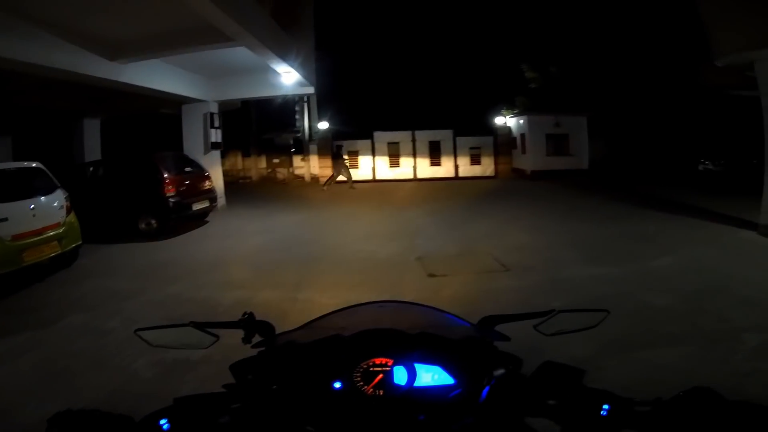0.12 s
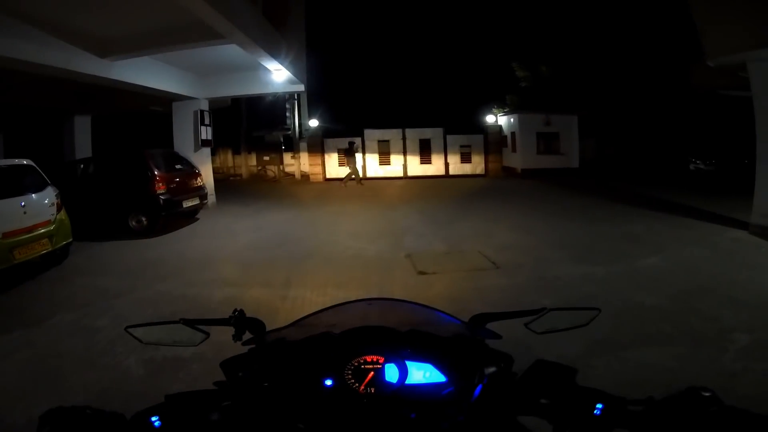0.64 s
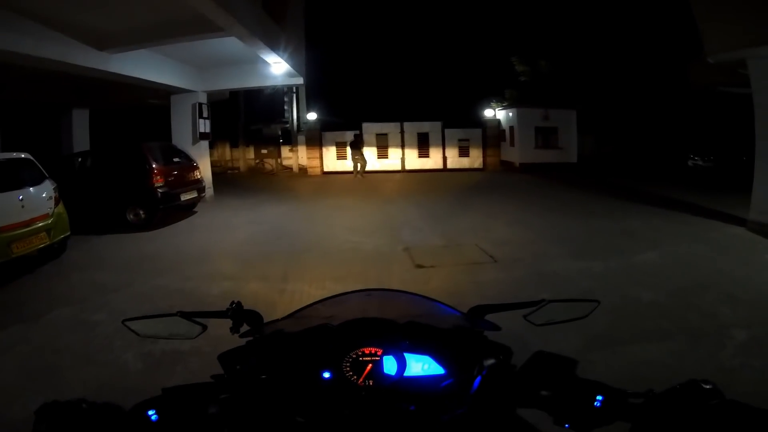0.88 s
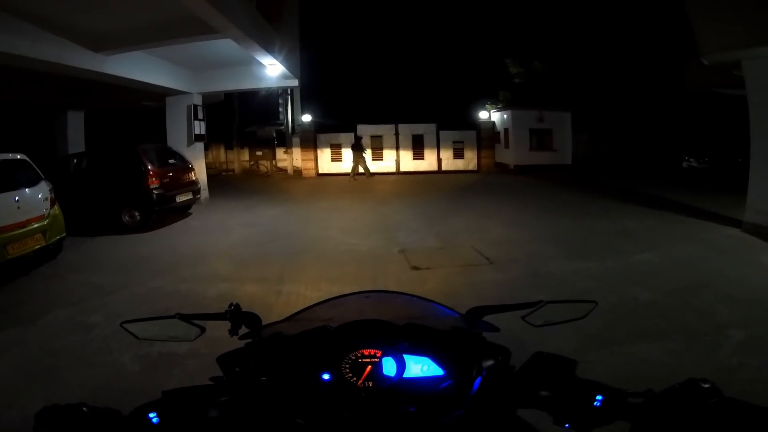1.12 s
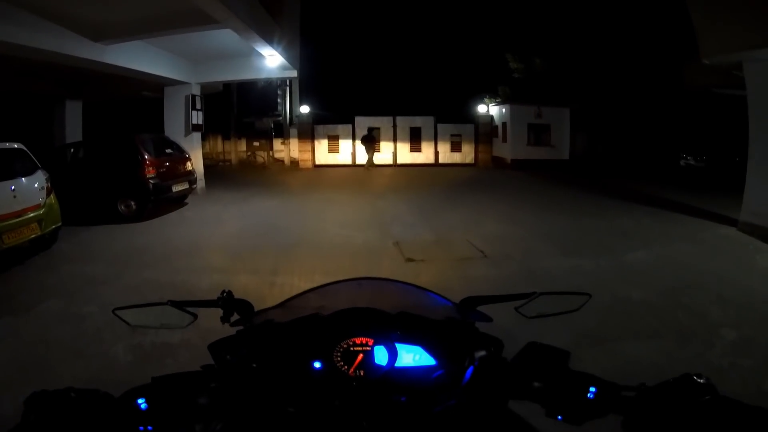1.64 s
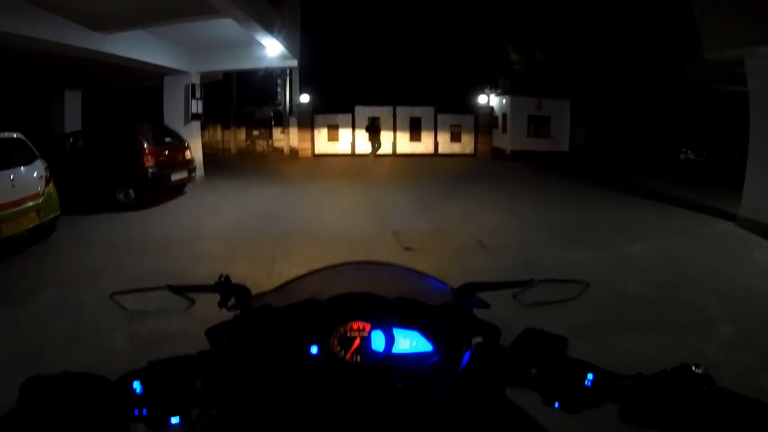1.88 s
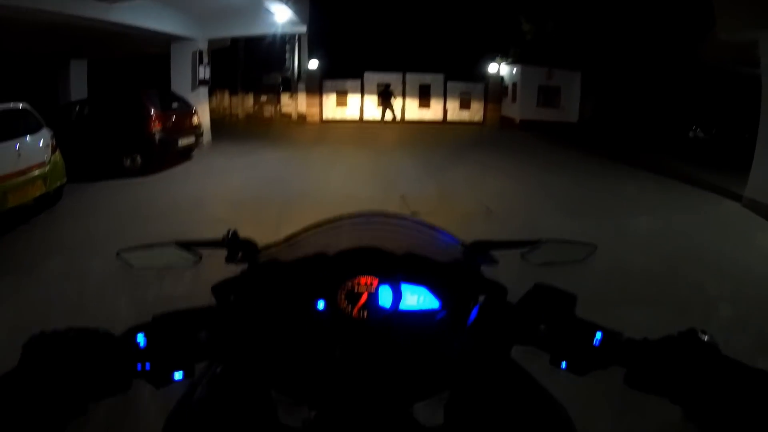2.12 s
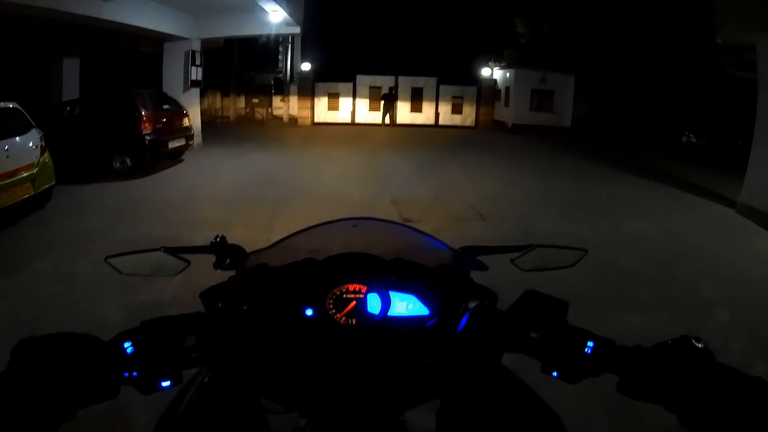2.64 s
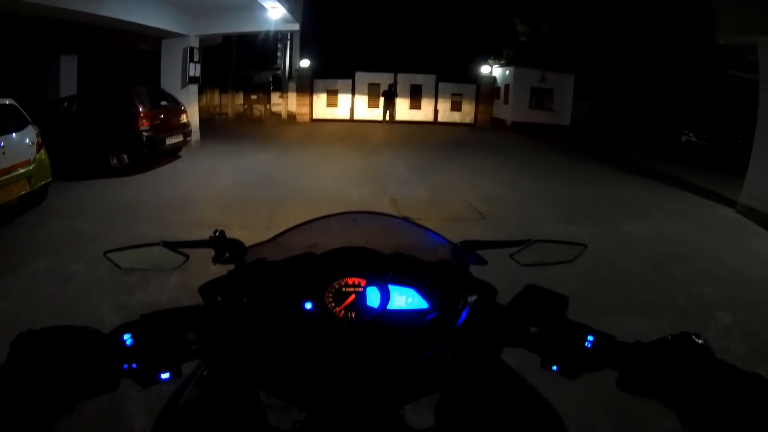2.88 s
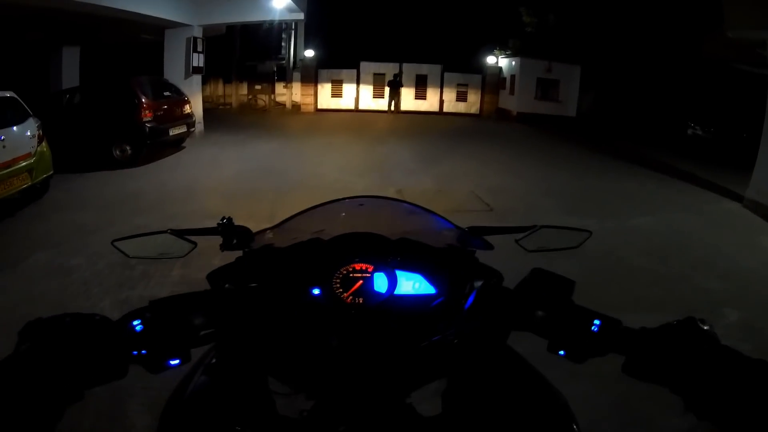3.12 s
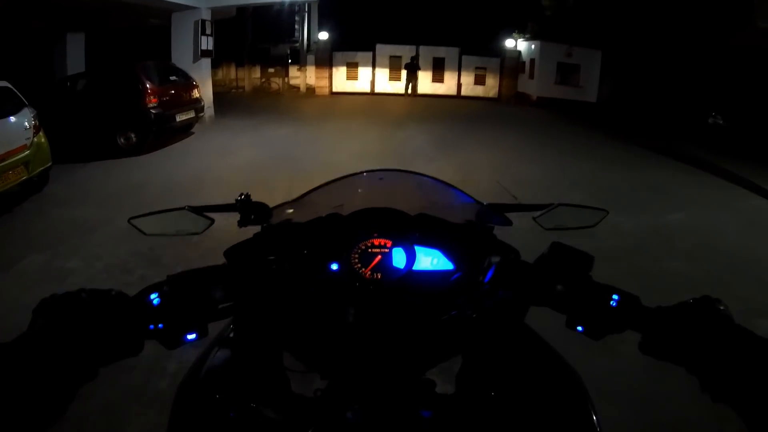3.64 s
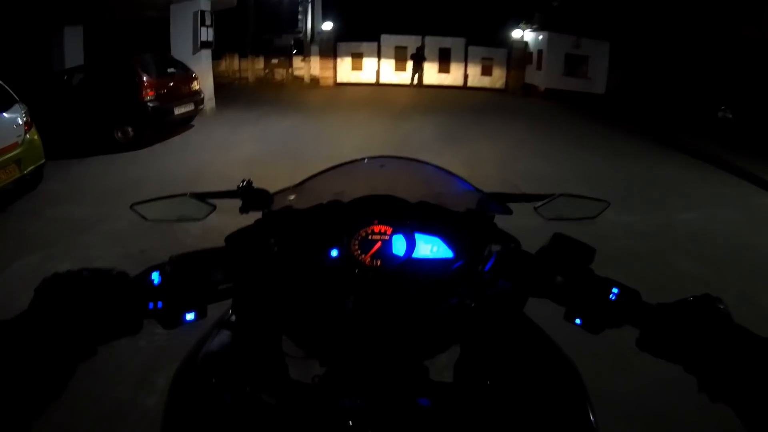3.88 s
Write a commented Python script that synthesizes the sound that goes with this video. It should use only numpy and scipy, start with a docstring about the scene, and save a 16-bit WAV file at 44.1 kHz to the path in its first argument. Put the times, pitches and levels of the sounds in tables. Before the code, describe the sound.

A single-cylinder motorcycle engine idles with slow thumps and clatter, then revs up a little.

```python
"""A single-cylinder motorcycle idles in a walled yard, heard from the rider's helmet; it revs a little.
Each cycle an exhaust blow rings the pipe and, soon after, an intake gulp rings the airbox.
Rattle and taps at set crank angles ring the cases; gear and chain noise follows the revs in pitch.
The walls answer in decaying noise tails; three small dry ticks sound close by over a faint hiss."""
import sys
import numpy as np
from scipy import signal
from scipy.fft import rfft, irfft, next_fast_len
from scipy.io import wavfile
from scipy.ndimage import uniform_filter1d, map_coordinates

SR = 44100
rng = np.random.default_rng(int(sys.argv[2]) if len(sys.argv) > 2 else 0)


def boost_factor(decibels):
    """Convert a level in decibels to a linear amplitude factor."""
    exponent = np.asarray(decibels, float) / 20
    return 10 ** exponent


def output_pcm(signal):
    """Save a mono or channel-first signal as 16-bit PCM at the path in sys.argv[1].

    Samples are clipped to [-1, 1] before scaling.
    """
    pcm = np.clip(np.atleast_2d(signal).T, -1, 1) * 32767
    wavfile.write(sys.argv[1], SR, np.round(pcm).astype(np.int16))


N = 176400


def unit(x):
    """Scale to rms 1."""
    return x / np.sqrt(np.mean(x ** 2) + 1e-20)


def curves(rows):
    """One value per sample for each column after the time."""
    time_s, *columns = np.transpose(rows)
    return [np.interp(np.arange(N) / SR, time_s, column) for column in columns]


def wobble(knots_per_s):
    """A smooth random curve through normal-distributed knots."""
    knots = rng.standard_normal(int(N * knots_per_s / SR) + 4)
    return map_coordinates(knots, [np.arange(N) * knots_per_s / SR])


def filtered(x, response):
    """x times a complex response of frequency, zero-padded."""
    size = next_fast_len(len(x) + SR // 2)
    return irfft(rfft(x, size) * response(np.fft.rfftfreq(size, 1 / SR)), size)[:len(x)]


def colour(points):
    """Gain from (frequency, dB) points on a log frequency axis."""
    f, db = np.transpose(points)
    return lambda hz: boost_factor(np.interp(np.log(hz + 1), np.log(f + 1), db))


def ringing(modes, flip=1):
    """Causal sum of resonances; flip=-1 alternates their signs."""
    def response(f):
        return sum(boost_factor(db) * flip ** k * 1j * f * width / (centre ** 2 - f * f + 1j * f * width)
                   for k, (centre, width, db) in enumerate(modes))
    return response


# engine speed: time_s, rate_firings_per_s
FIRING_RATE = [(0.0, 16.9), (0.215, 15.18), (0.628, 14.85), (0.785, 14.56), (0.926, 15.63), (1.033, 15.02),
               (1.122, 15.57), (1.488, 16.13), (1.618, 14.85), (1.769, 15.76), (2.098, 20.77),
               (2.442, 21.83), (2.644, 20.72), (2.826, 21.46), (3.292, 17.96), (3.606, 20.23),
               (3.729, 19.48), (4.0, 21.31)]
START_TURN_CYCLES = -.4016  # blows fall on whole cycles from 0
IDLE_FIRINGS_PER_S = 15


def crank():
    """Firing rate and its integral, the cycles turned."""
    rate, = curves(FIRING_RATE)
    return rate, START_TURN_CYCLES + np.cumsum(rate) / SR


JITTER_S, SCATTER_DB, PUFF_TOP_HZ = .0001, .8, 370


def puffs(times_s, level_db):
    """Gaussian-lowpassed pressure humps, each a little off in time and size."""
    chance = rng.standard_normal((len(times_s), 2))
    at = np.clip(np.round((times_s + JITTER_S * chance[:, 0]) * SR).astype(int), 0, N)
    size = boost_factor(level_db[np.minimum(at, N - 1)] + SCATTER_DB * chance[:, 1])
    spikes = np.bincount(at, size, N + 1)[:N]
    return filtered(spikes, lambda hz: np.exp(-(hz / PUFF_TOP_HZ) ** 2))


# puff sizes before GAS_DB; the gulp grows as the throttle opens: time_s, exhaust_db, intake_db
THROTTLE = [(0, 2, 4), (.4, 4, -8.5), (.85, 3.5, -2), (1.2, 4.5, -3), (1.55, 4, 2), (1.9, 3.5, 3),
            (2.4, 5, 7.5), (2.9, 4.5, 6.5), (3.3, 3.5, 0.5), (3.65, 2.5, 5.5), (4, 2.5, 5)]
# exhaust pipe modes: centre_hz, width_hz, level_db
PIPE_MODES = [(56.4, 38, -12), (87.7, 25.2, -2.4), (108.2, 12, -10), (145.4, 12, -2), (167.96, 4.9, 0.5),
              (188.5, 17, -15), (276.8, 8.6, -7.5), (368, 12, -14)]
# intake modes: centre_hz, width_hz, level_db
AIRBOX_MODES = [(58.3, 44, -6), (116.6, 6, -16), (124, 6.7, -11), (143.9, 11, -2.5), (168.5, 2.8, -9.5),
                (194.2, 17, -3.5), (255.4, 18, -8.5), (424, 8.6, -7.5)]
# broad band that both paths swallow: centre_hz, width_hz, level_db
SWALLOWED_BAND = [(156, 170, -16)]
GAS_DB = 21
INTAKE_LAG_S, INTAKE_LAG_CYCLES = .0021, .237  # summed
SAG_LEAD_S, REBOUND_LAG_S, SAG_DB = .0032, .0036, -31


def breathing():
    """Blows push through the pipe, gulps pull through the airbox; pressure sags before and rebounds after a blow."""
    rate, turn = crank()
    exhaust_db, intake_db = curves(THROTTLE)
    t = np.arange(N) / SR
    fire_s = np.interp(np.arange(int(turn[-1]) + 1), turn, t)
    gulp_s = fire_s + INTAKE_LAG_S + INTAKE_LAG_CYCLES / np.interp(fire_s, t, rate)

    def through(x, modes):
        return filtered(x, lambda f: ringing(modes)(f) - ringing(SWALLOWED_BAND)(f))

    rebound = puffs(fire_s + REBOUND_LAG_S, exhaust_db)
    sag = puffs(fire_s - SAG_LEAD_S, exhaust_db)
    blow = through(puffs(fire_s, exhaust_db), PIPE_MODES)
    gulp = through(puffs(gulp_s, intake_db), AIRBOX_MODES)
    return boost_factor(GAS_DB) * (boost_factor(SAG_DB) * (rebound - sag) + blow - gulp)


# common level of rattle, taps and gears before their own gains: time_s, level_db
MECHANICAL_LEVEL = [(0, -47), (.3, -49), (1, -49.5), (1.7, -49), (2.1, -47), (2.45, -46.5), (2.9, -47),
                    (3.3, -49), (3.6, -47.5), (4, -48)]
# clatter bursts: crank_angle_cycles, decay_cycles (to 1/e), level_db
VALVE_BURSTS = [(0.02, 0.079, -0.5), (0.2, 0.097, -2.5), (.5, 0.15, -4.5), (0.72, 0.11, 1)]
# engine case modes: centre_hz, width_hz, level_db
CASE_MODES = [(466, 35, -8), (647, 45, -1), (728, 73, 1), (1093, 42, -0.5), (1400.4, 28, 1), (1920, 28, -8),
              (2096, 34, -9.5), (2463, 46, -15.5), (2950, 52, -15.5), (3500, 89, -18.5), (4530, 110, -30),
              (4840, 79, -40)]
# roar spectrum, relative: frequency_hz, level_db_per_hz
ROAR_SPECTRUM = [(20, -120), (30, -16.5), (45, -22), (90, -9), (180, -1), (300, -3), (400, -9.5),
                 (520, -8.5), (650, -8), (1000, -13.5), (1600, -16.5), (2200, -26.5), (3200, -33.5),
                 (4200, -43), (5000, -48), (7000, -66), (9000, -120)]
CASES_LOW_HZ, CASES_TOP_HZ = 406, 3980
CASES_DB, ROAR_DB, STEADY_DB = -5.5, 4, -14.5
BURST_SCATTER_DB = 0.97
ROAR_SWELL = 0.55  # exponent: the roar follows the bursts less than the cases do


def rattle():
    """Valve and combustion noise in the cases: a steady part and bursts at fixed crank angles."""
    _, turn = crank()
    chance = rng.standard_normal((int(turn[-1]) + 3, len(VALVE_BURSTS)))
    swell = boost_factor(STEADY_DB)
    for k, (angle, decay, db) in enumerate(VALVE_BURSTS):
        since = turn - angle
        size = boost_factor(db + BURST_SCATTER_DB * chance[np.floor(since).astype(int) + 2, k])
        swell = swell + size * np.exp(-(since % 1) / decay)
    swell = uniform_filter1d(swell, size=350)  # samples
    cases = rng.standard_normal(N) * swell
    roar = rng.standard_normal(N) * swell ** ROAR_SWELL

    def case_response(f):
        band = f / np.hypot(f, CASES_LOW_HZ) / (1 + (f / CASES_TOP_HZ) ** 4)
        return ringing(CASE_MODES, flip=-1)(f) * band

    cases = boost_factor(CASES_DB) * unit(filtered(cases, case_response))
    roar = boost_factor(ROAR_DB) * unit(filtered(roar, colour(ROAR_SPECTRUM)))
    return boost_factor(curves(MECHANICAL_LEVEL)[0]) * (cases + roar)


# taps on the cases; firing and intake knocks dull and regular, valves bright and loose:
# crank_angle_cycles, relative_db, tilt_db_per_octave (about 1 kHz, at idle), looseness_0_to_1
CASE_TAPS = [(.06, 5, -7, .1), (0.24, 0.5, -9.5, .1), (.2, -9, 2.5, .7), (0.82, -2, 1.5, .6),
             (.84, -7, 2, .7)]
TAP_DB, TAP_SCATTER_DB, TAP_JITTER_S = -3.5, 6, .0012  # scatter and jitter at looseness 1
BRIGHTER_DB = 0.13  # per octave, per firing/s above idle


def taps():
    """Every tap rings each case mode by its own chance amount; more revs, brighter taps."""
    rate, turn = crank()
    angle, tap_db, tilt, loose = np.transpose(CASE_TAPS)
    due = np.interp(np.arange(int(turn[-1]))[:, None] + angle, turn, np.arange(N))
    chance = rng.standard_normal((*due.shape, len(CASE_MODES) + 1)) * loose[:, None]
    at = np.clip(due + TAP_JITTER_S * SR * chance[..., -1], 0, N - 1).astype(int)
    tilt = tilt + BRIGHTER_DB * (rate[at] - IDLE_FIRINGS_PER_S)
    rung = np.zeros(N)
    for k, mode in enumerate(CASE_MODES):
        centre = mode[0]
        size = boost_factor(tap_db + tilt * np.log2(centre / 1000) + TAP_SCATTER_DB * chance[..., k])
        hits = np.bincount(at.ravel(), size.ravel(), N)
        broad = ringing([(centre, centre / 2, 0)])
        rung += filtered(hits, lambda f: ringing([mode])(f) * broad(f))
    return boost_factor(curves(MECHANICAL_LEVEL)[0] + TAP_DB) * unit(rung)


# gear and chain noise spectrum, relative: multiple_of_firing_rate, level_db_per_multiple
MESH_SPECTRUM = [(25, -77), (38, -5.5), (55, -18), (70, -12), (80, -7.5), (92, -7), (100, -18),
                 (108, -38.5), (135, -15.5), (150, -26.5), (170, -22), (200, -36.5), (240, -38),
                 (290, -47.5), (330, -94)]
# tooth tones before wobble: multiple_of_firing_rate, peak_db_re_mesh_rms
TOOTH_TONES = [(67, -20), (84, -8), (85, -14), (91, -13), (92, -9), (94, -17)]
TOOTH_WANDER_RAD, TOOTH_WOBBLE_DB = 1.3, 1.9
MESH_DB, MESH_GROWS_DB = -6.5, 0.1341  # the second per firing/s above idle


def gears():
    """Noise and tooth tones laid out on the crank angle, so their pitch follows the revs."""
    rate, turn = crank()
    steps = 2048  # noise samples per cycle
    noise = rng.standard_normal(steps * int(turn[-1] + 3))
    noise = filtered(noise, lambda f: colour(MESH_SPECTRUM)(f * steps / SR))
    mesh = unit(map_coordinates(noise, [(turn + 1) * steps]))
    tones = np.zeros(N)
    for multiple, db in TOOTH_TONES:
        level = boost_factor(db + TOOTH_WOBBLE_DB * wobble(22))
        tones += level * np.cos(2 * np.pi * multiple * turn + TOOTH_WANDER_RAD * wobble(40))
    beat = boost_factor(1.75 * np.cos(2 * np.pi * (turn - .15)) + wobble(29.72))  # dB, once a cycle plus chance
    growth_db = MESH_GROWS_DB * (rate - IDLE_FIRINGS_PER_S)
    return boost_factor(curves(MECHANICAL_LEVEL)[0] + MESH_DB + growth_db) * beat * (mesh + tones)


# hiss spectrum, relative: frequency_hz, level_db_per_hz
HISS_SPECTRUM = [(300, -120), (2000, 0), (6000, 0), (8000, -1), (11500, -2), (13000, -8), (14500, -22)]
HISS_DB = -84.5  # rms


def hiss():
    """Steady faint noise, coloured by a fixed spectrum."""
    return boost_factor(HISS_DB) * unit(filtered(rng.standard_normal(N), colour(HISS_SPECTRUM)))


# reverberation: frequency_hz, t60_s
YARD_DECAY = [(60, .5), (500, 0.29), (4000, 0.059), (12000, 0.12)]
YARD_DB, WALL_LAG_S = -19, .025


def yard(x):
    """The walls' answer: noise tails, cross-faded each second because it changes as the rider moves."""
    f, t60_s = np.transpose(YARD_DECAY)
    out, hop, lag = np.zeros(N), SR, int(WALL_LAG_S * SR)
    for start in range(-hop, N, hop):
        hz, t, z = signal.stft(rng.standard_normal(SR // 2), SR, nperseg=1024)
        decay_s = np.interp(np.log(hz + 1), np.log(f), t60_s)[:, None]
        tail = signal.istft(z * boost_factor(-60 * t / decay_s), SR, nperseg=1024)[1]
        fade = np.clip(1 - np.abs(np.arange(N) - start - hop) / hop, 0, 1)
        first = max(start, 0)
        wet = signal.fftconvolve((x * fade)[first:start + 2 * hop], tail / np.linalg.norm(tail))
        out[first + lag:][:len(wet)] += wet[:max(N - first - lag, 0)]
    return boost_factor(YARD_DB) * out


# dry ticks: start_s, snap_peak_db, snap_hz, snap_width_hz (one resonance of two), body_peak_db
DRY_TICKS = [(.2204, -46, 8000, 4500, -31), (.7325, -51, 6300, 2500, -37), (3.4838, -49, 7000, 1000, -55)]
# hollow body of a tick: centre_hz, width_hz, level_db
TICK_BODY_MODES = [(1190, 970, 0)]
TICK_T60_S = .005


def ticks():
    """Small dry ticks near the microphone: a click and decaying noise ring a bright snap and a hollow body."""
    out, t = np.zeros(N), np.arange(SR // 50) / SR
    for start_s, snap_db, snap_hz, width_hz, body_db in DRY_TICKS:
        hit = ((t == 0) * 3 + 0.31 * rng.standard_normal(len(t))) * boost_factor(-60 * t / TICK_T60_S)
        for level_db, modes in (snap_db, [(snap_hz, width_hz, 0)]), (body_db, TICK_BODY_MODES):
            part = filtered(hit, lambda f: ringing(modes)(f) ** 2)
            out[round(start_s * SR):][:len(t)] += boost_factor(level_db) * part / np.abs(part).max()
    return out


def scene():
    """Bike, hiss, yard and ticks; only the bike excites the yard."""
    bike = breathing() + rattle() + taps() + gears()
    return (bike + hiss() + yard(bike) + ticks())[None]


def low_pass(x):
    """Removes everything above the highest recorded frequency."""
    return signal.sosfilt(signal.butter(12, 14300, fs=SR, output="sos"), x)


MIC_LOW_HZ = 34  # corner of each of two highpass stages


def record(dry):
    """The microphone drops the deepest bass: two first-order highpass stages."""
    mix = filtered(dry[0], lambda f: (1j * f / (1j * f + MIC_LOW_HZ)) ** 2)[None]
    return low_pass(mix)


dry = scene()
out = record(dry)
output_pcm(out)
```